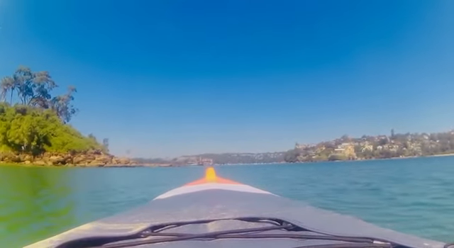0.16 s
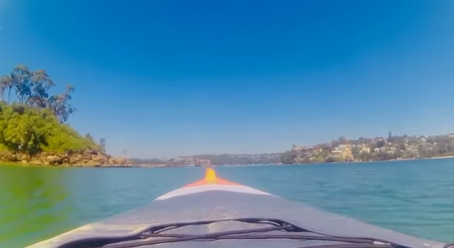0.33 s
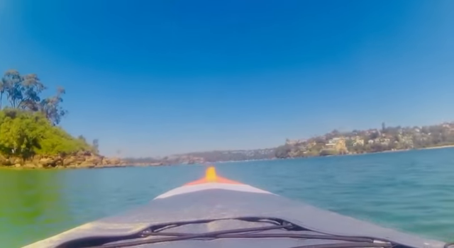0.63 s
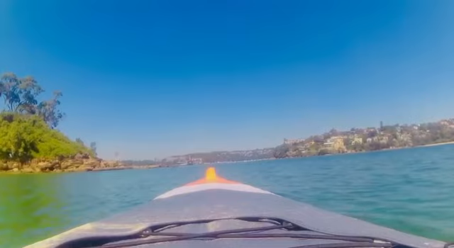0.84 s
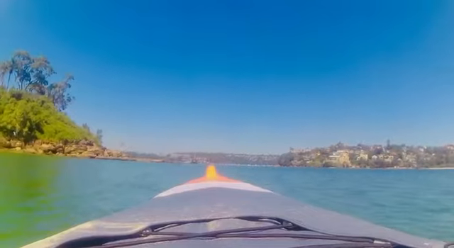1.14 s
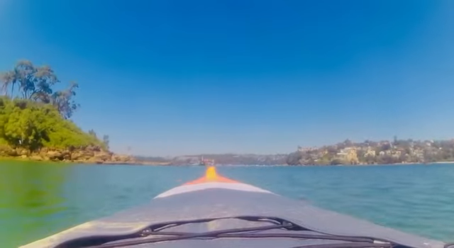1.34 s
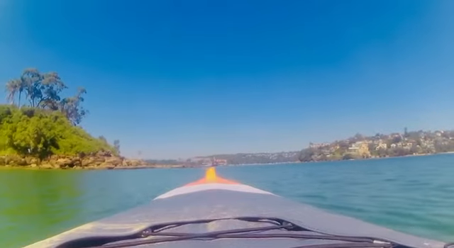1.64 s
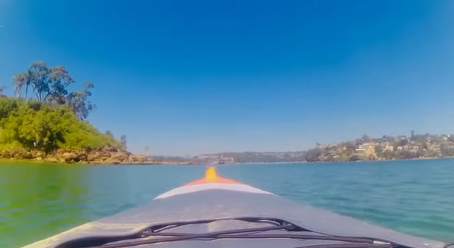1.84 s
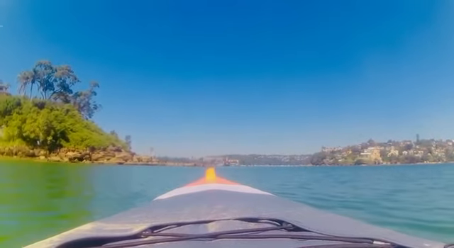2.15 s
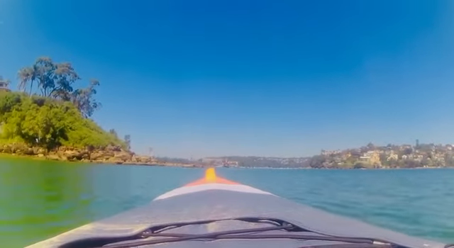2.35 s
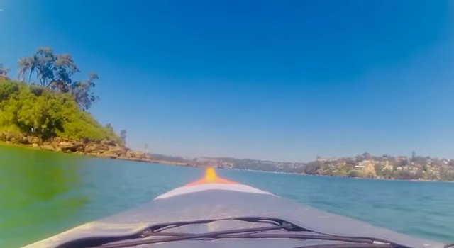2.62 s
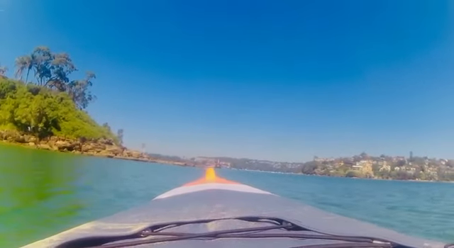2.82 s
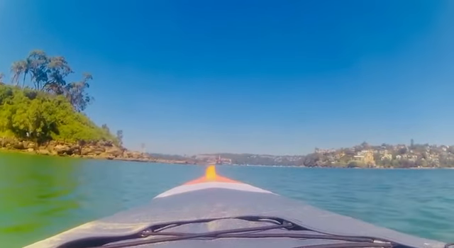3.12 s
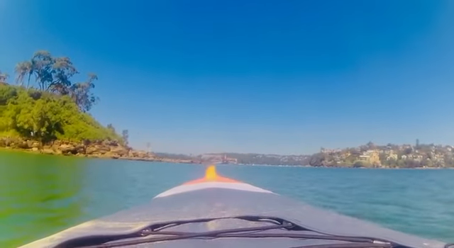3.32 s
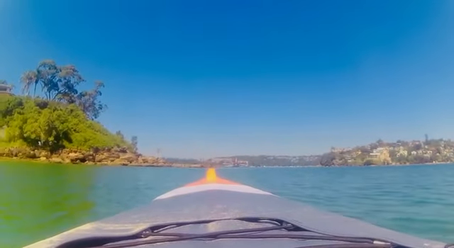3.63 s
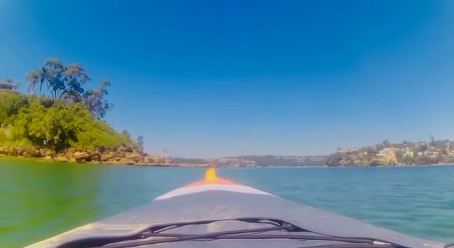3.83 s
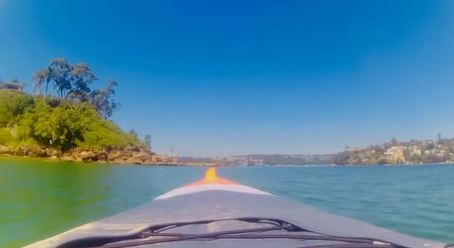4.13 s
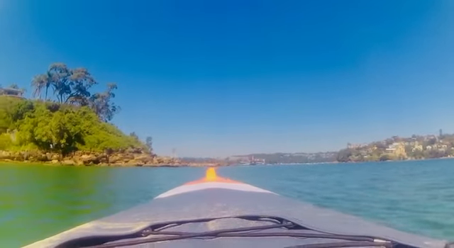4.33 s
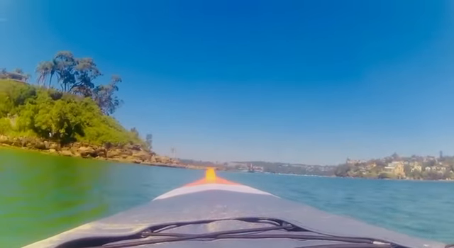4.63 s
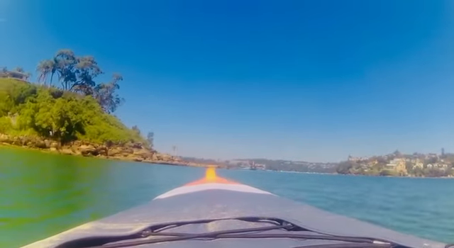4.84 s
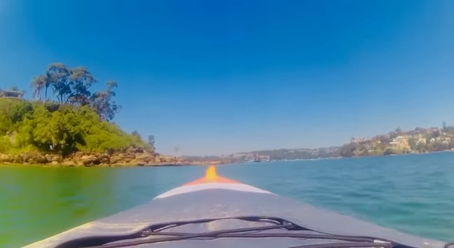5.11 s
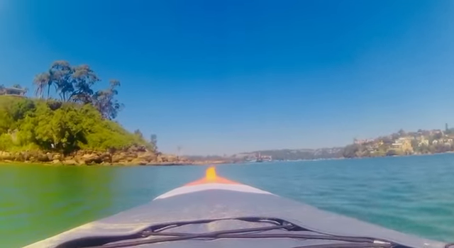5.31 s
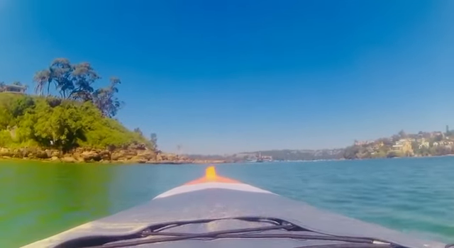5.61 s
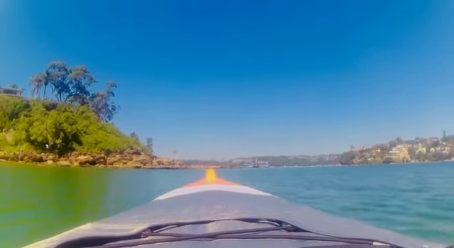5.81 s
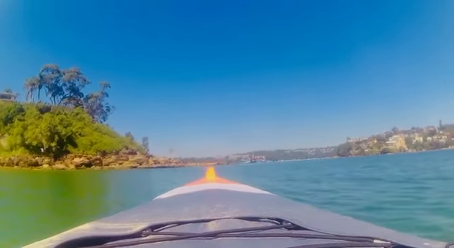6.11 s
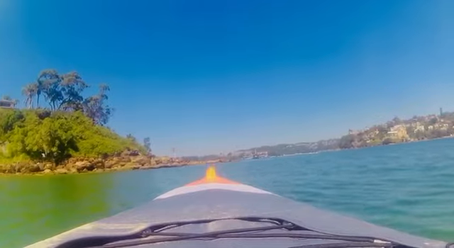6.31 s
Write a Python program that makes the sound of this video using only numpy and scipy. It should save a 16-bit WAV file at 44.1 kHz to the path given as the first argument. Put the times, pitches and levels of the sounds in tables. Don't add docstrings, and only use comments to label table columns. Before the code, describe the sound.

Muffled paddle knocks and small splashes through a kayak hull, drips and water lapping, over a thin high cicada buzz in short pulsing phrases.

```python
import sys
import numpy as np
from scipy import signal
from scipy.io import wavfile
from scipy.ndimage import uniform_filter1d

SR = 44100
rng = np.random.default_rng(int(sys.argv[2]) if len(sys.argv) > 2 else 0)


def generate_wav(signal):
    frames = np.transpose(np.atleast_2d(signal))
    scaled = np.clip(frames, -1, 1) * 32767
    pcm = np.round(scaled).astype(np.int16)
    wavfile.write(sys.argv[1], SR, pcm)


def decibels_to_gain(level_db):
    exponent = np.asarray(level_db, float) / 20
    return 10 ** exponent


N = 284886

# (time [s], length [s])
CICADA_PAUSES = [(0.144, 0.038), (0.477, 0.038), (0.853, 0.035), (1.178, 0.039), (1.45, 0.04),
                 (1.85, 0.037), (2.153, 0.034), (2.456, 0.085), (2.887, 0.037), (3.186, 0.037),
                 (3.498, 0.044), (3.891, 0.037), (4.188, 0.04), (4.49, 0.039), (4.876, 0.04),
                 (5.155, 0.042), (5.425, 0.035), (5.758, 0.038), (5.998, 0.033), (6.296, 0.036)]
# (frequency [Hz], level [dB])
FAR_TONES = [(8829, -77), (8904, -76)]
TOP_EDGES = [9640, 10100, 10500, 10900, 11250, 11650]
# (frequency [Hz], width [Hz], level [dB])
CASE_RESONANCES = [(684, 150, -9), (1230, 90, 0), (1560, 200, -11), (1850, 240, -6), (3280, 250, -17),
                   (4540, 500, -24)]
# (frequency [Hz], level [dB per Hz])
HISS_SPECTRUM = [(700, -11), (1500, -6.5), (2500, -2), (4000, -4.5), (7000, -6), (10000, -3.5),
                 (12500, -13)]
# (frequency [Hz], level [dB per Hz])
RUMBLE_SPECTRUM = [(11, -41.5), (18, 4.5), (70, 6.5), (108, -5), (194, -19), (220, -20), (290, -29),
                   (480, -120)]
# (frequency [Hz], level [dB per Hz])
SLOSH_SPECTRUM = [(76, -32.5), (130, -0.5), (1100, -17), (1430, -16.5), (2420, -120)]
# (frequency [Hz], level [dB per Hz])
SPRAY_SPECTRUM = [(1180, -21), (2000, -1), (3230, -8), (6500, -13), (8450, -44), (14300, -120)]
# (frequency [Hz], level [dB per Hz])
SPLASH_SPECTRUM = [(59, 9), (347, 9), (670, -2), (1250, -1.5), (1910, -15), (2400, -24), (4110, -32),
                   (9100, -63)]
# (time [s], length [s], rumble [dB], slosh [dB])
PULLS = [
    (0.935, 0.34, -50, -53.5),
    (2.132, 0.17, -52, -58),
    (2.909, 0.51, -52, -54),
    (4.17, 0.25, -50, -57.5),
    (5.447, 0.52, -54.5, -60.5),
]
# (time [s], length [s], wash [dB], spray [dB], trend [dB per s])
SURGES = [(.63, .04, -66, -82, 0), (.7, .03, -78, -76, 0), (0.797, 0.048, -66, -66.5, 0),
          (0.911, 0.024, -51.5, -64, 0), (0.934, 0.17, -62.5, -78, -4), (1.095, 0.202, -58, -78, 2),
          (2.115, 0.022, -57, -61, 0), (2.204, 0.079, -63, -66.5, 0), (2.915, 0.032, -53.5, -58, -3),
          (2.96, 0.083, -87, -71, -3), (3.047, 0.056, -57, -63.5, 0), (3.093, 0.133, -53, -70, -5),
          (3.218, 0.21, -57.5, -77, 2), (4.171, 0.042, -56, -64, 0), (4.275, 0.13, -63.5, -71, -8),
          (4.586, 0.059, -62, -63.5, 0), (5.458, 0.018, -58, -64, 0), (5.59, .04, -61, -61, 0),
          (5.676, 0.047, -67, -71, -5)]
# (time [s], peak [dB], pitch [Hz], t60 [s])
DRIPS = [(0.1506, -51, 1760, 0.017), (0.2274, -46.5, 1840, 0.019), (0.3057, -50, 1840, 0.02),
         (0.3571, -51, 1870, 0.026), (0.824, -55, 1920, 0.083), (1.3194, -55, 1930, 0.026),
         (1.4487, -48, 2110, 0.017), (1.516, -55, 1850, 0.03), (1.5808, -50.5, 1940, 0.024),
         (1.7898, -57, 1650, 0.02), (1.8522, -52.5, 2180, 0.03), (1.936, -55, 1670, 0.026),
         (2.2434, -52, 1270, 0.027), (2.24, -46, 1950, 0.025), (4.168, -38, 1300, .02),
         (4.172, -42, 1950, .02), (2.104, -40, 1350, .025), (4.21, -45, 1500, .02),
         (2.445, -50, 650, 0.056), (2.6285, -46.5, 1420, 0.011), (3.79, -50, 1970, 0.017),
         (3.8994, -47, 1190, 0.02), (4.0537, -53, 2250, 0.026), (4.2867, -40, 1260, 0.02),
         (4.355, -48.5, 2600, 0.015), (4.354, -44, 1800, 0.02), (4.597, -48, 1065, 0.04),
         (4.625, -49, 597, 0.049), (4.7267, -48.5, 1600, 0.031), (5.092, -48.5, 1200, 0.017),
         (5.6249, -46.5, 1740, 0.023), (5.699, -47, 1260, 0.029), (5.8301, -56, 2180, 0.028),
         (5.9125, -56, 1590, 0.026), (6.3749, -51, 1225, 0.03)]
# (time [s], peak [dB], centre [Hz])
TICKS = [(0.383, -50.5, 3050), (0.7194, -57, 4310), (0.798, -55, 4100), (2.013, -48, 4280),
         (2.9108, -36, 3400), (2.912, -41, 5500), (2.9404, -57, 4200), (3.062, -46, 3330),
         (3.088, -48, 3250), (3.041, -50, 3250), (3.104, -53, 3100), (3.125, -52, 3300), (3.16, -55, 3200),
         (3.1, -54, 4400), (3.058, -54, 4500), (0.897, -50, 3200), (0.91, -55, 4100), (0.708, -54, 4150),
         (0.795, -55, 3150), (1.21, -55, 3200), (1.003, -57, 4500), (0.8, -53, 2200), (2.915, -42, 2300),
         (2.911, -39, 4200), (2.913, -46, 6600), (2.013, -53, 3200), (2.104, -47, 2600), (5.456, -47, 2600),
         (3.1, -49, 2050), (3.13, -50, 2250), (3.5234, -57, 4670), (4.302, -55, 3450), (4.355, -65, 4380),
         (4.63, -48.5, 4170), (4.6674, -55, 4540), (5.308, -62, 3000), (5.4836, -54, 4180),
         (5.6207, -58, 4160), (5.9085, -55, 4710), (5.955, -56, 4700), (6.03, -58, 2940),
         (4.058, -55, 4300), (4.169, -46, 3200), (4.178, -50, 3350), (2.122, -54, 4000), (4.2, -55, 4300),
         (3.4, -56, 2800), (5.462, -48, 3200)]
# (time [s], peak [dB], ring [Hz], upper ring [dB])
SLAPS = [(0.7786, -56, 1250, -63), (0.9398, -47, 1310, -49), (0.9692, -52, 1280, -60),
         (0.9916, -53, 1310, -55), (1.0061, -51, 1210, -59), (1.0264, -54, 1210, -59),
         (1.06, -51, 1220, -59), (1.0754, -53, 1310, -62), (1.1049, -47, 1320, -57),
         (1.1348, -47, 1170, -51), (1.1784, -50, 1170, -54), (1.2062, -41, 1130, -51),
         (1.2194, -46, 1250, -51), (1.2341, -45, 1220, -57), (1.2575, -47, 1340, -56),
         (1.2875, -46, 1240, -54), (2.1194, -48, 1200, -54), (2.1944, -52, 1220, -58),
         (2.2358, -49, 1240, -51), (2.2862, -52, 1240, -59), (3.0584, -46, 1240, -48),
         (3.0909, -45, 1370, -49), (3.1034, -46, 1360, -48), (3.1218, -44, 1250, -49),
         (3.1344, -44, 1210, -44), (3.1534, -44, 1200, -47), (3.1754, -47, 1180, -54),
         (3.1931, -45, 1210, -49), (3.2094, -46, 1220, -59), (3.2271, -49, 1240, -53),
         (3.265, -49, 1210, -53), (3.2939, -53, 1230, -56), (3.3458, -48, 1260, -58),
         (3.3638, -46, 1240, -54), (3.3982, -46, 1150, -53), (3.4072, -43, 1170, -52),
         (3.4391, -49, 1230, -64), (4.2043, -43, 1340, -51), (4.2652, -47, 1360, -60),
         (4.3024, -54, 1240, -59), (4.3301, -52, 1290, -50), (4.5965, -51, 1130, -58),
         (4.6194, -53, 1150, -56), (5.4844, -44, 1240, -55), (5.5882, -53, 1120, -54),
         (5.6174, -58, 1190, -52), (5.6785, -51, 1240, -61)]
# (time [s], peak [dB], ring [Hz], t60 [s], crack [dB])
KNOCKS = [(0.896, -39.5, 668, 0.031, -42.5), (.8965, -42, 1250, 0.013, -65), (0.901, -26, 353, 0.015, -56),
          (2.102, -33.5, 268, 0.035, -38.5), (2.108, -33, 510, 0.029, -65), (2.1055, -31, 1020, 0.011, -55),
          (2.111, -30, 196, 0.018, -48), (2.2062, -27, 270, 0.012, -56), (2.918, -33, 790, 0.04, -52),
          (2.911, -31, 1850, 0.011, -40), (2.9125, -29, 135, .026, -50), (3.037, -21, 282, 0.018, -41.5),
          (3.0365, -32.5, 1440, 0.011, -60), (3.045, -27, 417, 0.021, -56), (3.089, -45, 700, 0.1, -60),
          (4.167, -47, 198, 0.059, -35), (4.169, -34.5, 412, 0.033, -62), (4.167, -36, 800, .02, -58),
          (4.171, -32, 199, 0.02, -54), (5.455, -24.5, 203, 0.01, -39.5), (5.454, -28.5, 740, 0.035, -47),
          (5.455, -33, 460, 0.04, -60), (5.465, -30, 203, 0.02, -53)]
# (time [s], peak [dB], ring [Hz], crack [dB])
MORE_KNOCKS = [(0.938, -60, 202, -50.5), (1.007, -47, 204, -54), (1.236, -34.5, 209, -65),
               (1.2865, -41.5, 860, -45), (2.207, -44, 403, -70), (1.311, -37, 130, -73), (2.121, -57, 277, -50),
               (2.214, -54, 248, -75), (4.176, -43, 202, -51), (4.188, -53, 225, -44.5), (4.203, -65, 799, -44),
               (4.266, -43, 202, -62), (4.313, -45, 323, -58), (4.403, -55, 450, -72), (4.912, -41.5, 150, -79),
               (5.474, -42, 250, -49), (5.577, -42, 299, -55)]
# (time [s], peak [dB], pitch [Hz], length [s])
HARD_BLOW = (2.9108, -11.3, 526, .0082)
# (time [s], peak [dB], pitch [Hz], t60 [s])
THUMPS = [(0.908, -32, 37.4, 0.061), (0.938, -38, 50, 0.093), (1.335, -37, 45.6, 0.079),
          (2.115, -33, 61.9, 0.091), (2.147, -37, 63, 0.1), (2.207, -38.5, 58, 0.11),
          (2.9118, -29.5, 70, 0.055), (2.9133, -24, 350, .02), (4.1768, -30, 300, .012),
          (4.183, -38, 110, .03), (3.047, -39, 71.6, 0.062), (3.149, -40, 32.2, 0.086),
          (4.184, -39.5, 74.5, 0.1), (4.214, -39, 38, 0.14), (4.398, -35, 77, 0.059),
          (4.909, -42, 69, 0.045), (5.468, -36.5, 79, 0.18), (5.498, -29.5, 70, 0.077),
          (5.552, -37, 32, 0.13), (5.579, -42, 70, 0.19), (5.844, -35.5, 45.4, 0.13),
          (5.879, -51, 66, 0.11)]
# (time [s], peak [dB], start pitch [Hz])
GULPS = [
    (1.287, -45.5, 418),
    (4.385, -44, 400),
    (4.899, -45.5, 420),
]
# (time [s], level [dB])
DECK_BLOWS = [
    (2.917, -38.5),
    (3.092, -47.5),
]
# (frequency [Hz], level [dB], t60 [s])
DECK_MODES = [(645, 0, .3), (668, -3, .06), (795, -11, .09), (495, -10, .1), (1540, -14, .1),
              (1255, -20, .12), (1850, -17, .12)]


def rms_one(x):
    return x / np.sqrt(np.mean(x ** 2) + 1e-20)


def drift(rate):
    r = np.exp(-80 * np.pi * rate / SR)
    slow = signal.lfilter([1], [1, -2 * r, r * r], rng.standard_normal(N // 40 + 2002))[2000:]
    return np.interp(np.arange(N) / 40, np.arange(len(slow)), rms_one(slow))


def clicks(per_s, spread_db):
    sizes = decibels_to_gain(spread_db * np.minimum(rng.exponential(1, N), 5)) * rng.choice([-1, 1], N)
    return sizes * (rng.random(N) < per_s / SR)


def band_pass(x, order, low, high):
    return signal.sosfilt(signal.butter(order, [low, high], "band", fs=SR, output="sos"), x)


def banded(source, spectrum, patchy_db, flicker_hz):
    hz, level_db = np.transpose(spectrum)
    out, together = 0, drift(flicker_hz / 2)
    sources = source, np.roll(source, N // 3)
    lows = hz[0] * 2 ** np.arange(0, np.log2(hz[-1] / hz[0]) - .25, .5)
    for k, low in enumerate(lows):
        band = band_pass(sources[k % 2], 2, low, low * 2 ** .5)
        flicker = patchy_db * (1.11 * together + drift(flicker_hz))
        band_db = np.interp(np.log(low * 2 ** .25), np.log(hz), level_db)
        out = out + band * decibels_to_gain(band_db + flicker)
    return rms_one(out)


def in_case(x):
    out = 0
    for k, (hz, width_hz, level_db) in enumerate(CASE_RESONANCES):
        r = np.exp(-np.pi * width_hz / SR)
        top = (-1) ** k * decibels_to_gain(level_db) * (1 - r * r) / 2
        out = out + signal.lfilter([top, 0, -top], [1, -2 * r * np.cos(2 * np.pi * hz / SR), r * r], x)
    return out


def add(out, s, piece):
    i = round(s * SR)
    out[i:i + len(piece)] += piece[:N - i]


def swell(hz, t60, rise=0):
    t = np.arange(round(2 * t60 * SR) + 10) / SR
    kt = np.log(1000) / t60 * t
    height = (np.e * kt / 2) ** 2 * np.exp(-kt)
    return height * np.sin(2 * np.pi * hz * t * (1 + rise * t / t60))


def envelope(calm_db, rows, rise_s, fall_s):
    t, power = np.arange(0, N + 32, 32) / SR, decibels_to_gain(calm_db) ** 2
    for s, length, level_db, trend_db in rows:
        held = np.clip(t - s, 0, length)
        rise = np.clip((t - s) / rise_s + 1, 0, 1)
        fall = np.exp((held - np.maximum(t - s, 0)) / fall_s)
        power = power + (decibels_to_gain(level_db + trend_db * held) * rise * fall) ** 2
    return np.interp(np.arange(N) / SR, t, np.sqrt(power))


def silence(late_start=0, late_end=0, edge=.003, ragged=0):
    t, out = np.arange(N) / SR, np.zeros(N)
    for s, length in CICADA_PAUSES:
        early, late = ragged * rng.standard_normal(2) if ragged else (0, 0)
        out[(t > s + late_start + early) & (t < s + length + late_end + late)] = 1
    return uniform_filter1d(out, max(round(edge * SR), 1))


def song(hz, width_hz, per_s, uneven):
    beat = np.cumsum(per_s * (1 + uneven * drift(60)) / SR)
    marks = np.diff(np.floor(beat), prepend=0) > 0
    kicks = marks * np.exp(2j * np.pi * rng.random(N))
    r = np.exp(-np.pi * width_hz / SR)
    rings = signal.lfilter([1], [1, -2 * r, r * r], kicks + 1e-18)
    rings /= np.sqrt(uniform_filter1d(np.abs(rings) ** 2, SR // 500) + 2.5)
    return rms_one((rings * np.exp(2j * np.pi * np.cumsum(hz) / SR)).real)


def near_cicada():
    t = np.arange(N) / SR
    starts = np.array([-.1] + [s + length for s, length in CICADA_PAUSES])
    since = t - starts[np.searchsorted(starts, t) - 1]
    wobble = np.cos(2 * np.pi * 30.5 * (since - .004))
    pitch = 9040 + 50 * drift(0.92) + 220 * wobble + 130 * drift(61.6)
    near = song(pitch, width_hz=500, per_s=630, uneven=0.44) * (1 - silence())
    near = signal.sosfilt(signal.butter(3, 8250, "high", fs=SR, output="sos"), near)
    return near * decibels_to_gain(-59.0 + 0.49 * drift(2))


def far_cicada():
    beat = np.cumsum(8830 / 117 * (1 + .0003 * drift(2)) / SR)
    ribs = np.diff(np.floor(beat), prepend=0)
    r = np.exp(-np.pi * 170 / SR)
    far = rms_one(signal.lfilter([1], [1, -2 * r * np.cos(2 * np.pi * 8880 / SR), r * r], ribs))
    far = far + song(8870 + 25 * drift(4), width_hz=110, per_s=300, uneven=.3)
    tones = 0
    for hz, db in FAR_TONES:
        turns = np.cumsum(hz + 3.0 * drift(4.0)) / SR
        tones = tones + decibels_to_gain(db + 3 + 1.5 * drift(3.0)) * np.sin(2 * np.pi * turns)
    return far * decibels_to_gain(-77.0) + tones


def microphone_hiss():
    return decibels_to_gain(-68) * banded(rng.standard_normal(N), HISS_SPECTRUM, patchy_db=.3, flicker_hz=10)


def hull_water():
    calm_db, rise_s, fall_s = -58, 0.033, 0.029
    rumble = envelope(calm_db, [(s, n, db, 0) for s, n, db, _ in PULLS], rise_s, fall_s)
    slosh = envelope(calm_db, [(s, n, db, 0) for s, n, _, db in PULLS], rise_s, fall_s)
    out = rumble * banded(rng.standard_normal(N), RUMBLE_SPECTRUM, patchy_db=-1.5, flicker_hz=12.0)
    return out + slosh * banded(rng.standard_normal(N), SLOSH_SPECTRUM, patchy_db=1.0, flicker_hz=25)


def air_pocket(grains):
    pitch_hz, wander_hz, width_hz = 1245, 40, 90
    kicks = grains * np.exp(2j * np.pi * rng.random(N))
    pocket = signal.lfilter([1], [1, -np.exp(-np.pi * width_hz / SR)], kicks)
    turns = np.cumsum(pitch_hz + wander_hz * drift(6.0)) / SR
    return rms_one((pocket * np.exp(2j * np.pi * turns)).real)


def wash_and_spray():
    rise_s = 0.014
    wash_rows = [(s, n, db, trend) for s, n, db, _, trend in SURGES]
    spray_rows = [(s, n, db, trend) for s, n, _, db, trend in SURGES]
    wash = envelope(-73.5, wash_rows, rise_s, fall_s=0.0081)
    spray = envelope(-70, spray_rows, rise_s, fall_s=0.014)
    grains = clicks(2000 * decibels_to_gain(4.0 * drift(40)), 3.5)
    out = decibels_to_gain(-1.5) * wash * rms_one(in_case(band_pass(grains, 3, 1050, 2300)))
    out += decibels_to_gain(-8) * wash * air_pocket(grains)
    out += decibels_to_gain(-14.5) * spray * rms_one(band_pass(in_case(grains), 4, 2700, 5500))
    fine = banded(clicks(6000, 3.2), SPRAY_SPECTRUM, patchy_db=2.0, flicker_hz=30)
    return out + decibels_to_gain(-0.2) * spray * fine


def drips():
    out, t = np.zeros(N), np.arange(SR // 30) / SR
    for s, peak_db, hz, t60 in DRIPS:
        add(out, s, decibels_to_gain(peak_db - 4.5) * swell(hz, 0.48 * t60, rise=0.041))
        burst = rng.standard_normal(len(t)) * np.exp(-t / .008)
        add(out, s, decibels_to_gain(peak_db + 1.5) * band_pass(burst, 2, hz / 1.2, hz * 1.2))
    return out


def ticks():
    out, t = np.zeros(N), np.arange(SR // 30) / SR
    for s, peak_db, hz in TICKS:
        burst = rng.standard_normal(len(t)) * np.exp(-t / 0.0042)
        puff = band_pass(burst, 4, hz / 1.17, hz * 1.17)
        add(out, s, decibels_to_gain(peak_db) * puff / np.abs(puff).max())
    return out


def slaps():
    out, puffs, t = np.zeros(N), np.zeros(N), np.arange(SR // 30) / SR
    for s, peak_db, hz, upper_db in SLAPS:
        add(out, s - .001, decibels_to_gain(peak_db - 4) * swell(hz, t60=.015))
        upper_hz = 1800 * rng.uniform(.92, 1.07)
        add(out, s - .001, decibels_to_gain(upper_db + 0.7) * swell(upper_hz, t60=.009))
        add(puffs, s, decibels_to_gain(peak_db + 12) * np.exp(-t / 0.004) * rng.standard_normal(len(t)))
    return out + band_pass(in_case(puffs), 4, 700, 3600)


def knocks():
    out, cracks, tail = np.zeros(N), np.zeros(N), np.zeros(N)
    t = np.arange(SR // 4) / SR
    crack_shape = np.exp(-t / 0.0062) * (1 - np.exp(-t / 0.00059))
    splash_shape = np.exp(-t / 0.02) * (1 - np.exp(-t / 0.0046))
    common_t60 = 0.018
    contacts = KNOCKS + [(s, db, hz, common_t60, crack) for s, db, hz, crack in MORE_KNOCKS]
    for s, peak_db, hz, t60, crack_db in contacts:
        add(out, s, decibels_to_gain(peak_db) * swell(hz, 0.47 * t60, rise=-0.03))
        add(cracks, s, decibels_to_gain(crack_db + 21.5) * crack_shape * rng.standard_normal(len(t)))
        splash_db = -50 + 0.44 * (min(peak_db, -25) + 39.5)
        add(tail, s, decibels_to_gain(splash_db) * splash_shape)
    splash = banded(rng.standard_normal(N), SPLASH_SPECTRUM, patchy_db=2.5, flicker_hz=60)
    thud = band_pass(cracks, 3, 300, 1600)
    dull = signal.sosfilt(signal.butter(4, 4500, fs=SR, output="sos"), in_case(cracks))
    return out + 0.32 * thud + dull + tail * splash


def thumps():
    out = np.zeros(N)
    for s, peak_db, hz, t60 in THUMPS:
        add(out, s, decibels_to_gain(peak_db) * swell(hz, 0.483 * t60))
    return out


def gulps():
    out, t60 = np.zeros(N), 0.047
    for s, peak_db, hz in GULPS:
        add(out, s, decibels_to_gain(peak_db) * swell(hz, t60, rise=-0.362)[:round(1.3 * t60 * SR)])
    return out


def hard_blow():
    out = np.zeros(N)
    s, peak_db, hz, length = HARD_BLOW
    t = np.arange(SR // 4) / SR
    t = t[t < length]
    add(out, s, decibels_to_gain(peak_db) * np.sin(np.pi * t / length) ** 1.3 * -np.sin(2 * np.pi * hz * t))
    return out


def deck():
    out, t = np.zeros(N), np.arange(SR // 2) / SR
    onset = 1 - np.exp(-t / 0.0033)
    for s, blow_db in DECK_BLOWS:
        for hz, level_db, t60 in DECK_MODES:
            add(out, s, np.sin(2 * np.pi * hz * t) * decibels_to_gain(blow_db + level_db - 60 * t / t60) * onset)
    return out


def scene():
    ashore = near_cicada() + far_cicada()
    water = hull_water() + wash_and_spray() + drips() + ticks() + slaps()
    boat = knocks() + thumps() + gulps() + hard_blow() + deck()
    return (ashore + microphone_hiss() + water + boat)[None]


def low_pass(x):
    return signal.sosfilt(signal.butter(12, 12100, fs=SR, output="sos"), x)


def record(dry):
    out = signal.sosfilt(signal.ellip(12, .5, 45, 9520, fs=SR, output="sos"), dry)
    for low, high in zip(TOP_EDGES, TOP_EDGES[1:]):
        band = signal.sosfilt(signal.ellip(4, .5, 45, [low, high], "band", fs=SR, output="sos"), dry)
        ragged_s = .011 * (low > TOP_EDGES[0])
        opening = silence(late_start=.008, late_end=.008, edge=.025, ragged=ragged_s)
        out = out + decibels_to_gain(1.5) * band * opening
    return low_pass(out)


dry = scene()
out = record(dry)
generate_wav(out)
```